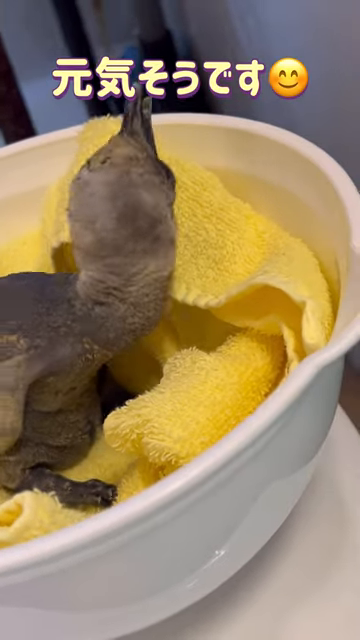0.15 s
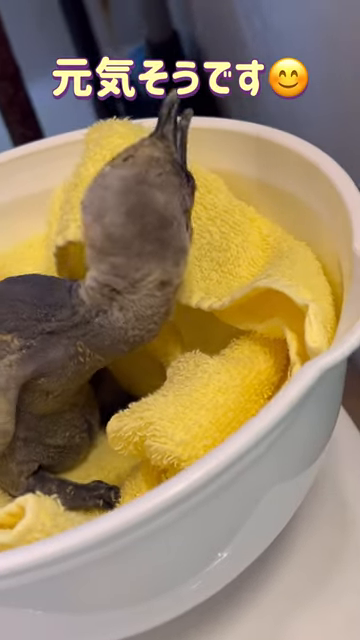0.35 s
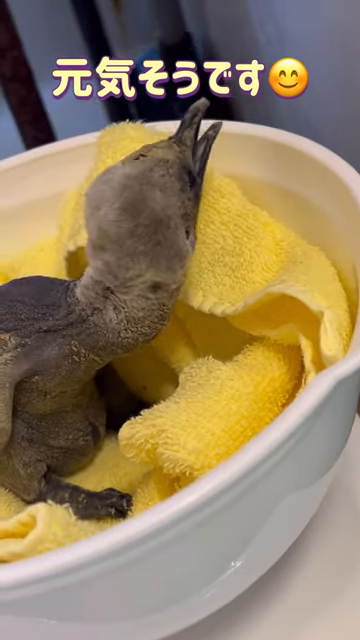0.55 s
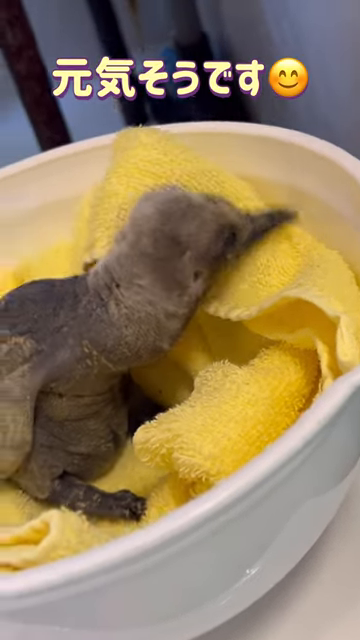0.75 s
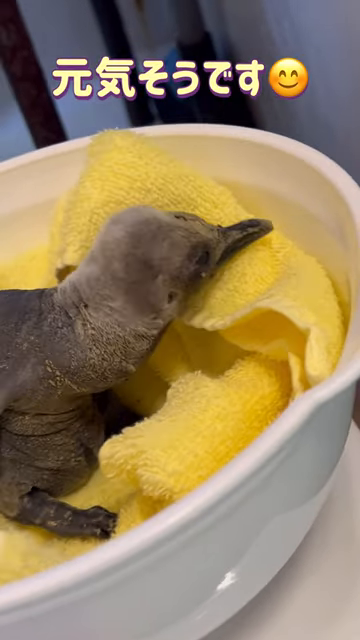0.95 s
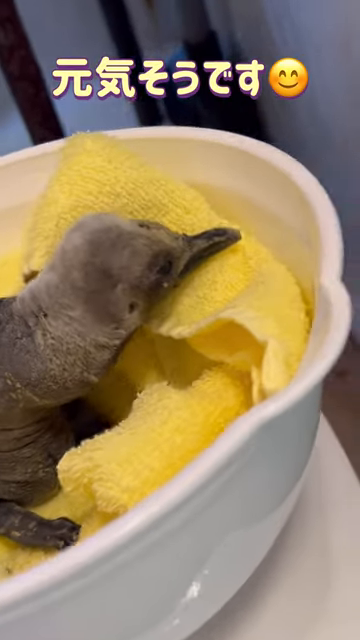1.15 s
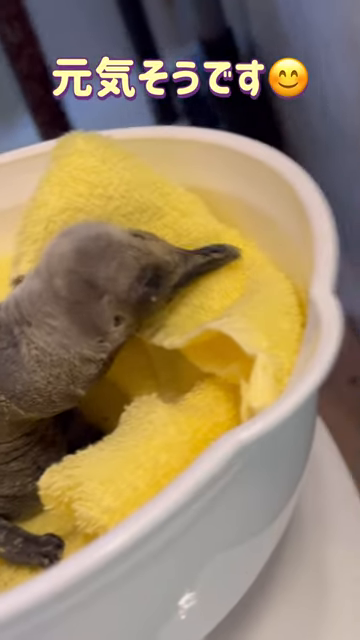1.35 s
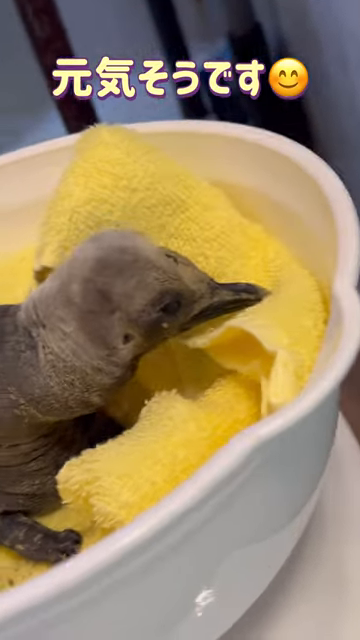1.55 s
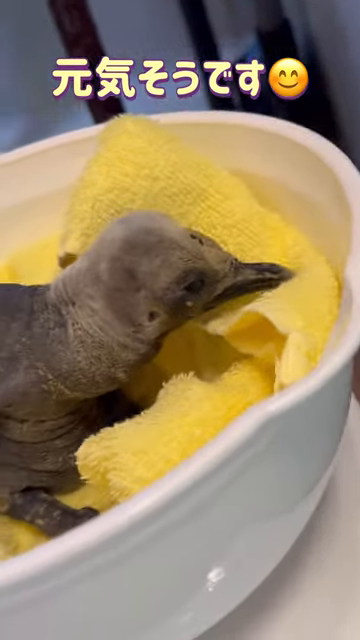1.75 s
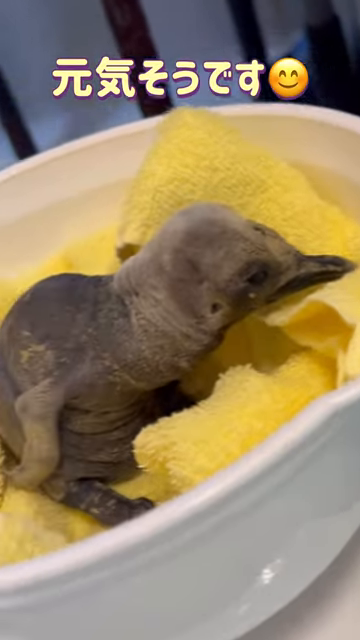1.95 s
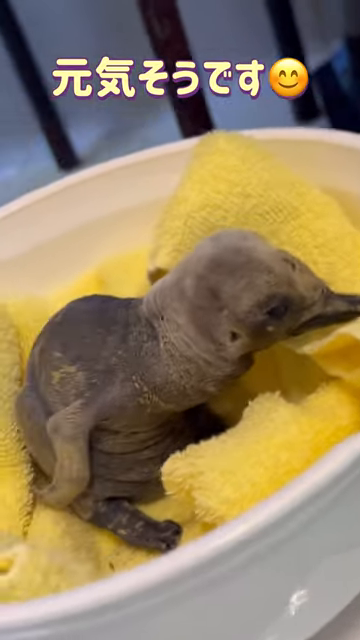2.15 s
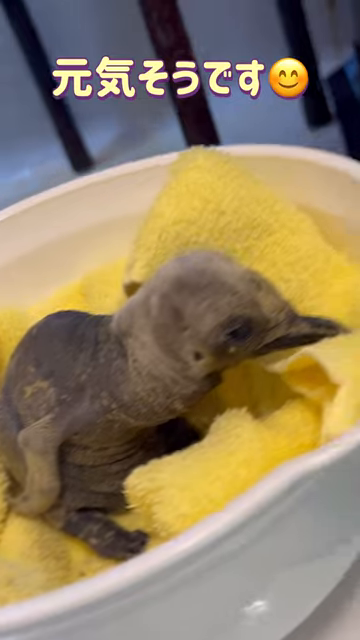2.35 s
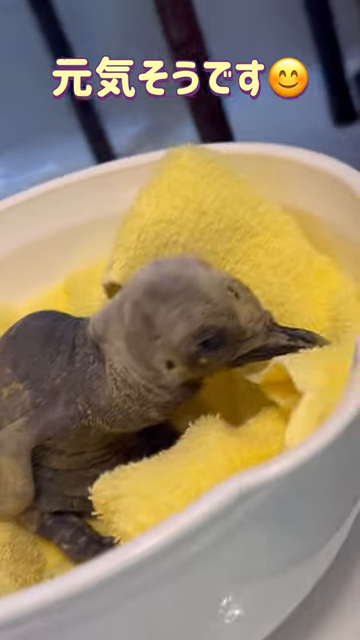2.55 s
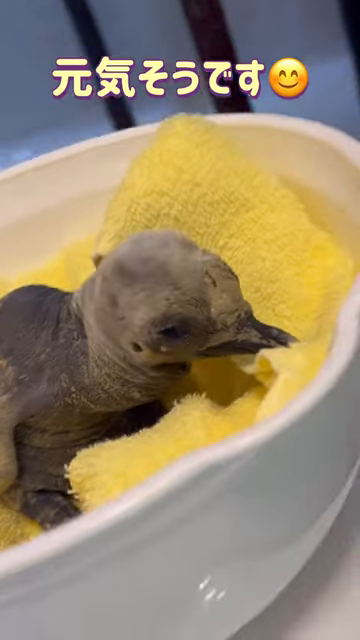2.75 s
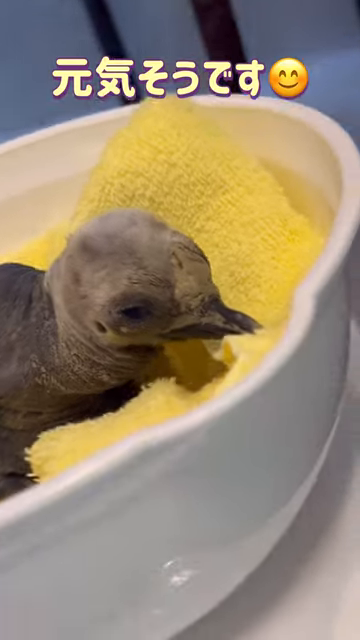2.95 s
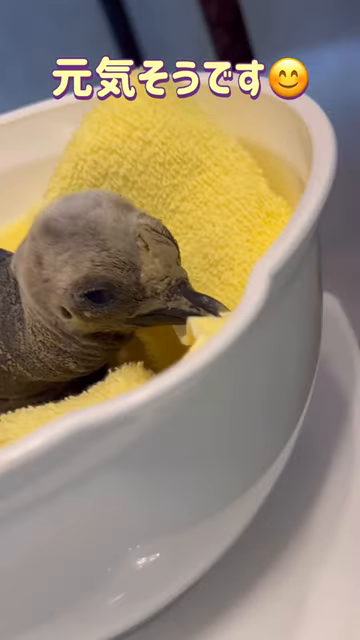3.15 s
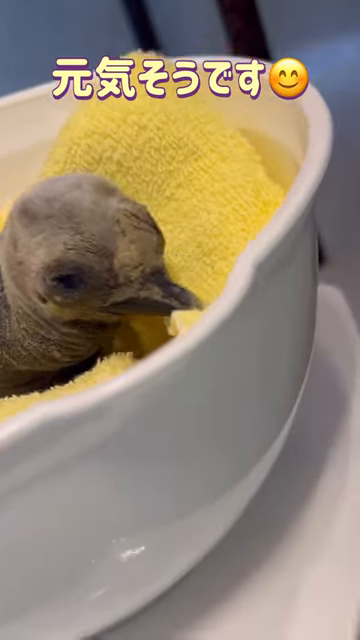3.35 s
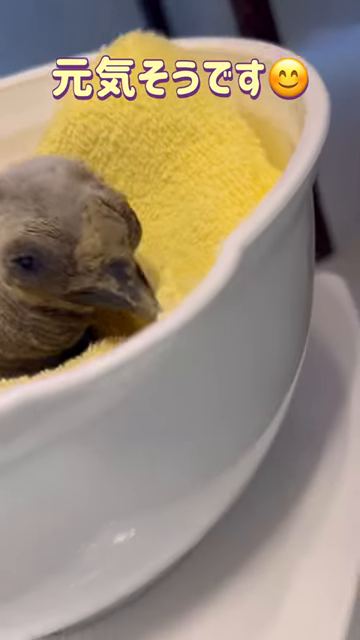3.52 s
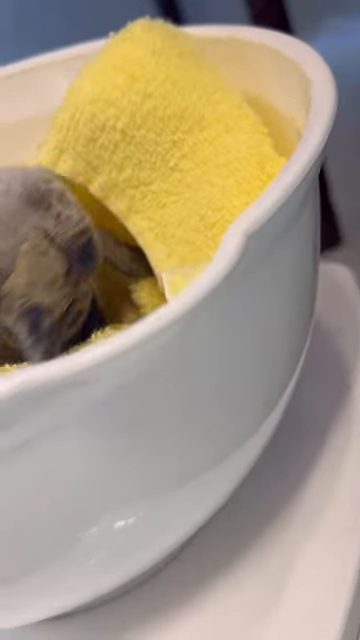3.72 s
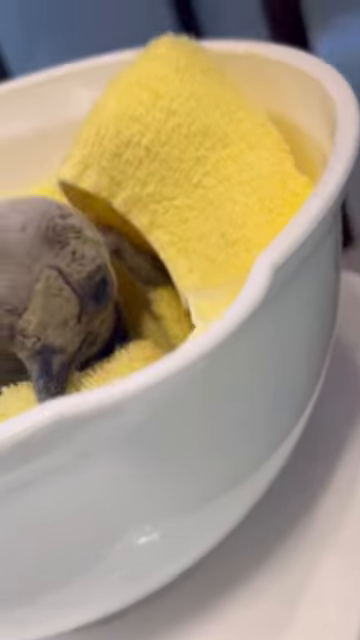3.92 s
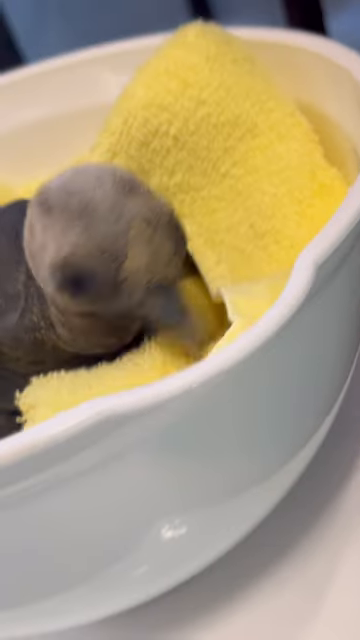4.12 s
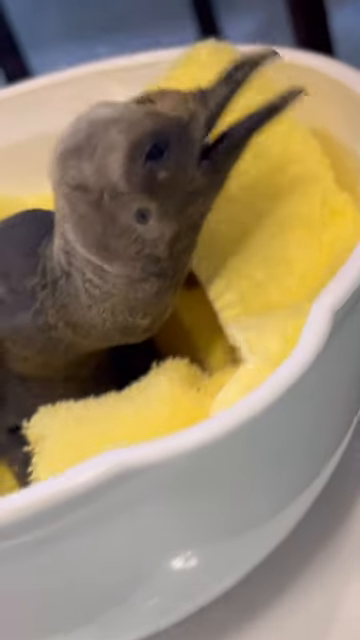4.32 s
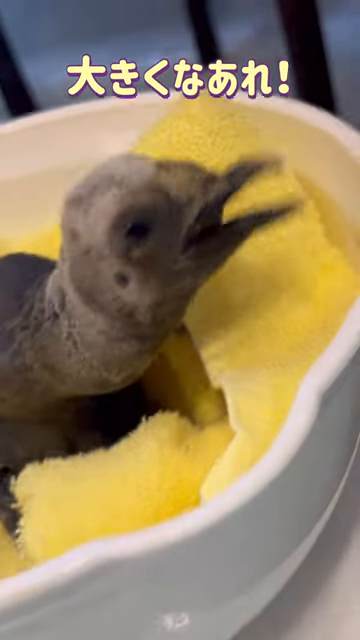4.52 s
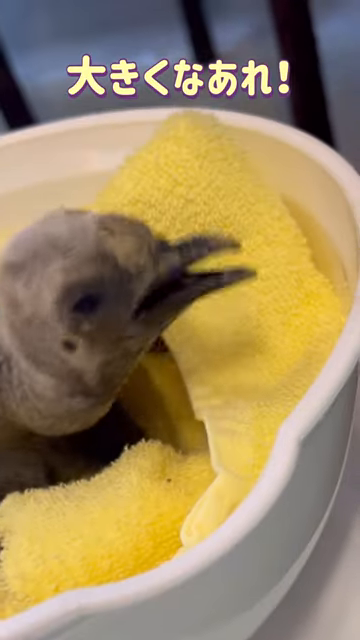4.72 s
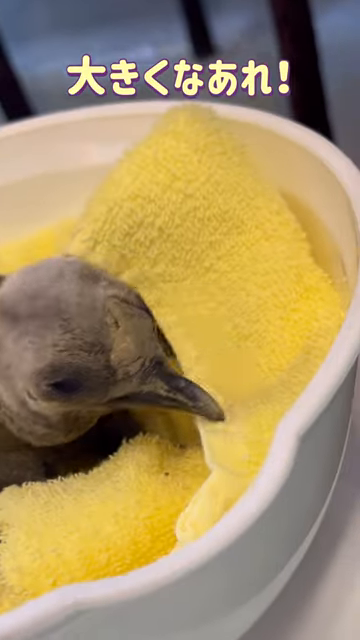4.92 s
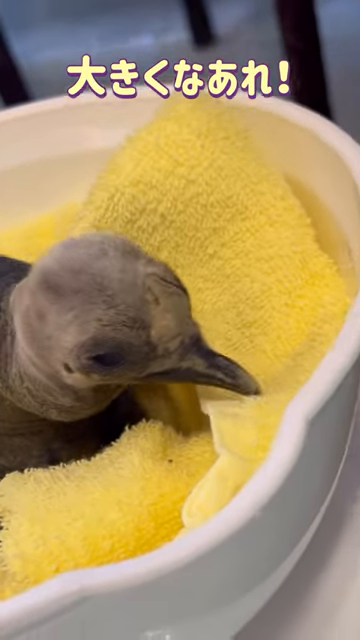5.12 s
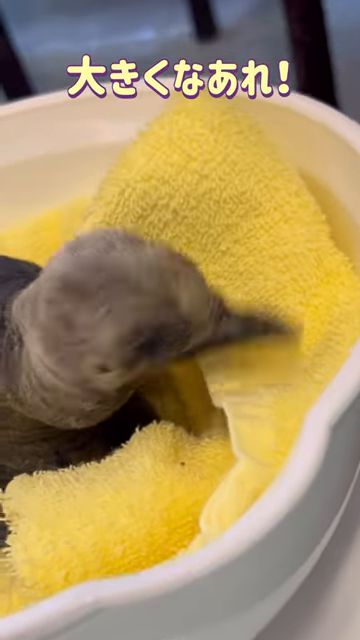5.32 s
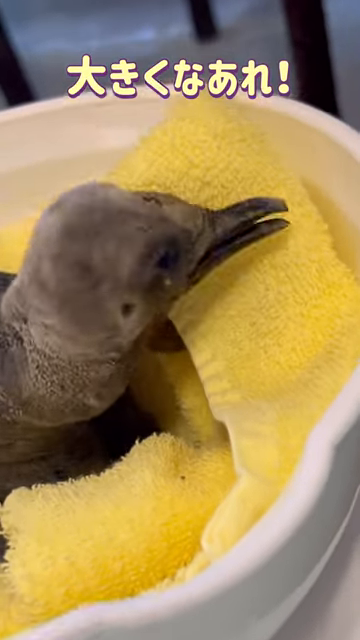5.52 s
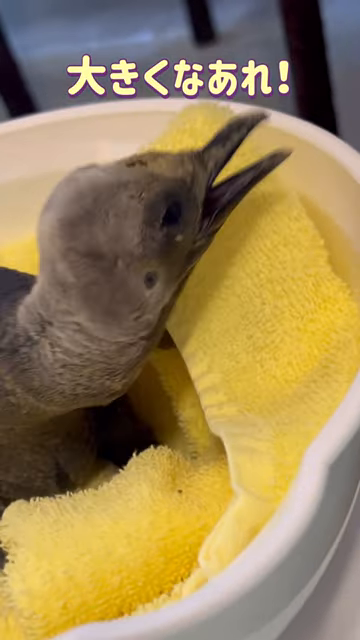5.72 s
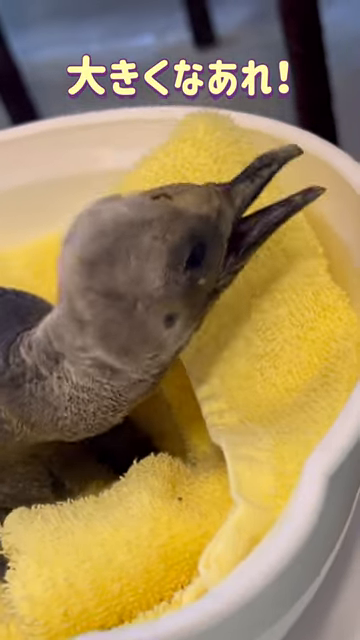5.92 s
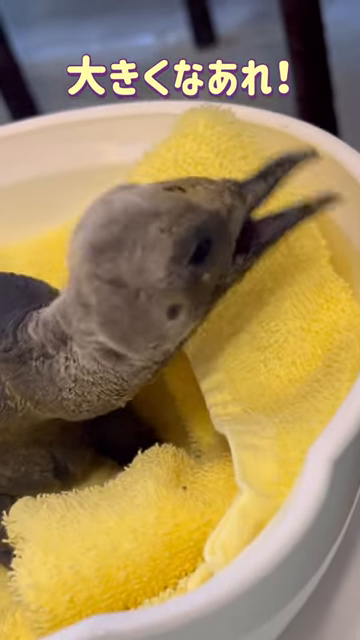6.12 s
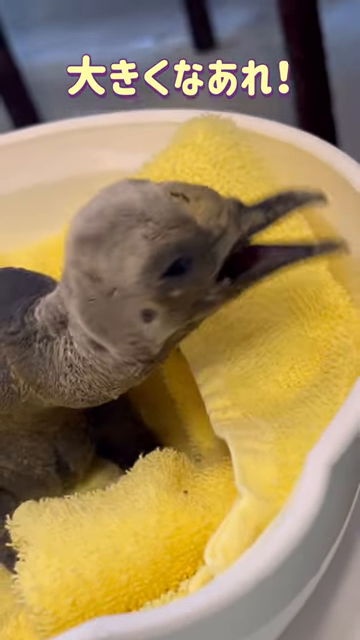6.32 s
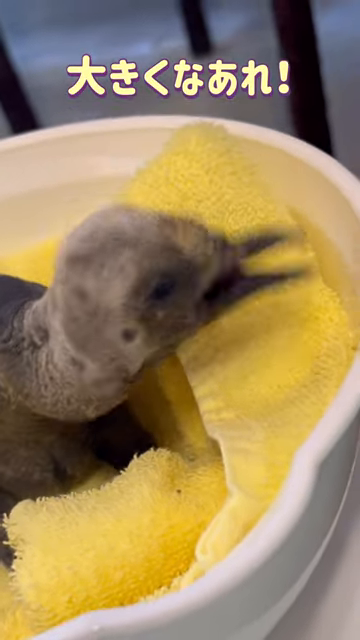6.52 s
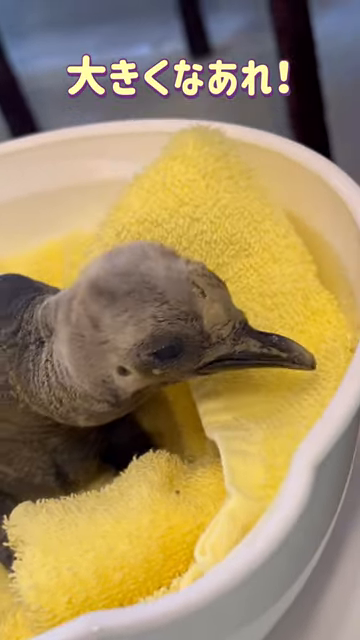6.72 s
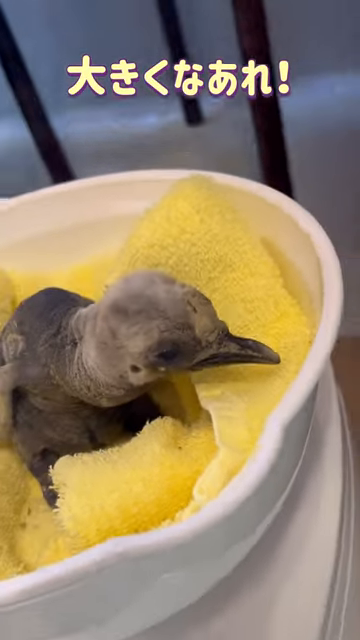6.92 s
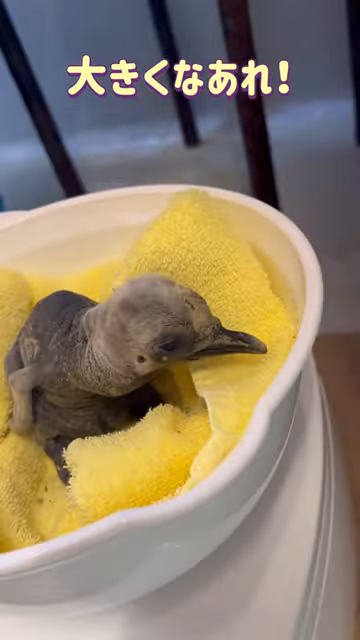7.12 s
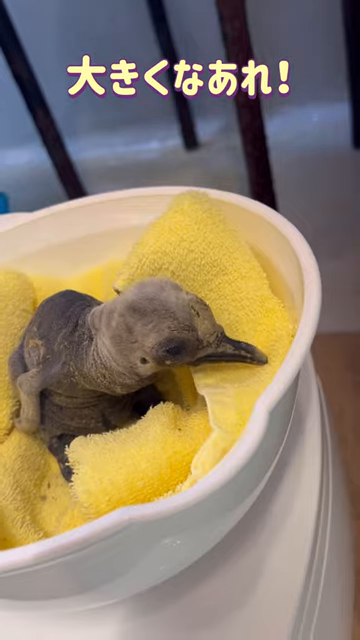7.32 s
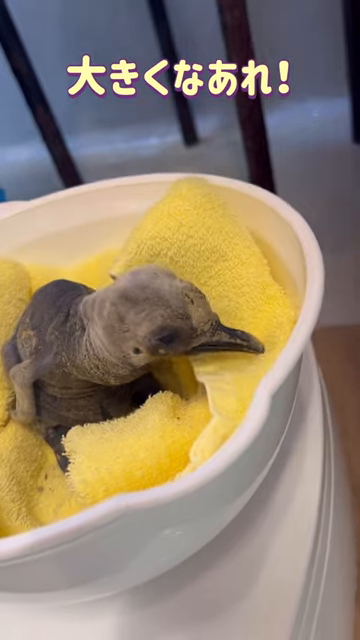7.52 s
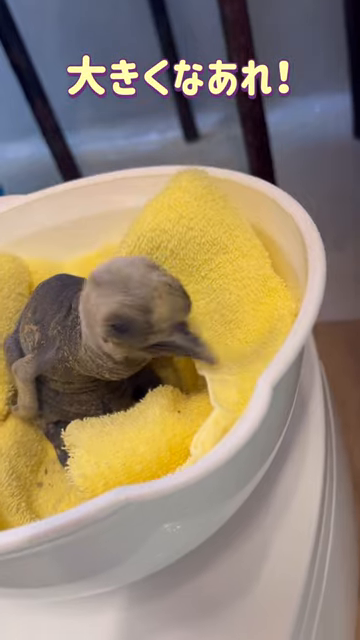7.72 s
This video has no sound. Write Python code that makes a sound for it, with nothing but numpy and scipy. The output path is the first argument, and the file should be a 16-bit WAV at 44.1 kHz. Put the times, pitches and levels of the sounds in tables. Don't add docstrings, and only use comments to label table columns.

```python
import sys
import numpy as np
from scipy import signal
from scipy.fft import rfft, irfft, next_fast_len
from scipy.io import wavfile
from scipy.ndimage import uniform_filter1d

SR = 44100
rng = np.random.default_rng(int(sys.argv[2]) if len(sys.argv) > 2 else 0)


def unload_audio(sound):
    columns = np.transpose(np.atleast_2d(sound))
    steps = np.round(np.clip(columns, -1, 1) * 32767)
    wavfile.write(sys.argv[1], SR, steps.astype(np.int16))


def natural_amplitude(level_db):
    exponent = np.asarray(level_db, float) / 20
    return 10 ** exponent


N = 346626

# time [s], pitch [Hz], whistle level [dB].
FIRST_BURST = [
    [(0.199, 2539, -49), (0.215, 2897, -20), (0.245, 2970, -14.5), (0.27, 2800, -24), (0.288, 2650, -33)],
    [(0.291, 2820, -24), (0.312, 3180, -20), (0.333, 3000, -16), (0.345, 3098, -19), (0.362, 2900, -28),
     (0.383, 2700, -44)],
    [(0.386, 2610, -38), (0.409, 3230, -17.5), (0.432, 2800, -14), (0.46, 2790, -15), (0.474, 2736, -27),
     (0.49, 2560, -18), (0.508, 2294, -28), (0.538, 2180, -28), (0.56, 2230, -38)],
    [(0.561, 2240, -39), (0.584, 2460, -37), (0.61, 2750, -60)],
]
SECOND_BURST = [
    [(4.238, 2068, -52), (4.268, 2590, -32.5), (4.3, 3005, -13.5), (4.338, 2933, -18), (4.368, 3050, -33),
     (4.392, 3017, -43)],
    [(4.418, 2848, -44), (4.434, 3062, -12), (4.45, 2592, -27), (4.468, 3073, -27), (4.492, 3010, -52)],
    [(4.517, 2758, -32), (4.537, 3130, -9.5), (4.567, 2680, -18.5), (4.593, 2862, -12.5),
     (4.615, 2460, -25), (4.651, 2046, -26), (4.675, 1870, -26.5), (4.694, 1994, -27.5), (4.725, 2300, -52)],
]
THIRD_BURST = [
    [(5.696, 2537, -40), (5.71, 2963, -16), (5.76, 3252, -16.5), (5.82, 3254, -17.5), (5.836, 3030, -15),
     (5.846, 2850, -30), (5.885, 2700, -60)],
    [(5.975, 2946, -33), (5.993, 3243, -15.5), (6.018, 2740, -19), (6.03, 2490, -27), (6.058, 1856, -25),
     (6.07, 2500, -34), (6.097, 3202, -60)],
    [(6.179, 2806, -38), (6.195, 2875, -13), (6.205, 2800, -16), (6.216, 2900, -25), (6.222, 2946, -40),
     (6.235, 2900, -52)],
    [(6.28, 2656, -37), (6.296, 2870, -15), (6.33, 2490, -27.5), (6.37, 2283, -26.5), (6.428, 2570, -37),
     (6.455, 2379, -52)],
]
NOTES = FIRST_BURST + SECOND_BURST + THIRD_BURST
# centre [Hz], width [Hz], level [dB].
BEAK = [(3685, 470, 4.5), (2770, 1050, -0.5), (4150, 300, -5), (1850, 640, -10.5)]
# frequency [Hz], phase [rad].
PORT_TURN = [(2500, 0), (3700, -.07), (4200, -.4), (4650, -1.1), (5000, -3.1), (5350, -5.1), (5800, -6.0),
             (6500, -6.28), (7400, -6.6), (8400, -7.3), (10200, -7.9), (11900, -8.5), (12900, -9.42),
             (14600, -9.42), (15400, -8.7)]


def rms_one(x):
    return x / np.sqrt(np.mean(x ** 2) + 1e-20)


def in_time(rows):
    s, *columns = np.transpose(rows)
    return [np.interp(np.arange(N) / SR, s, c) for c in columns]


def at_hz(points, hz):
    points_hz, values = np.transpose(points)
    return np.interp(np.log(hz + 1), np.log(points_hz), values)


def wobble(hz):
    r = np.exp(-2 * np.pi * hz / SR)
    noise = rng.standard_normal(N + SR)
    return rms_one(signal.lfilter([1], [1, -2 * r, r * r], noise)[SR:])


def resonate(x, hz, width_hz):
    r = np.exp(-np.pi * width_hz / SR)
    zeros = [(1 - r * r) / 2, 0, (r * r - 1) / 2]
    poles = [1, -2 * r * np.cos(2 * np.pi * hz / SR), r * r]
    return signal.lfilter(zeros, poles, x)


def resonate_twice(x, hz, width_hz):
    return resonate(resonate(x, hz, width_hz), hz, width_hz)


def coloured(spectrum, low_hz, high_hz):
    hz = np.arange(N // 2 + 1) * SR / N
    gain = natural_amplitude(at_hz(spectrum, hz))
    inside = (hz > low_hz) & (hz < high_hz)
    noise = irfft(rfft(rng.standard_normal(N)) * gain, N)
    return noise / np.sqrt(2 * np.sum(gain[inside] ** 2) / N)


def phase_of(hz):
    return 2 * np.pi * np.cumsum(hz) / SR


def chick():
    # start [s], length [s], pitch ratio to the whistle
    # at start, ratio at end, level [dB].
    lower_voice = [
        (.205, 0.059, 0.71, .64, -57),
        (.41, 0.13, .67, .66, -44),
        (4.255, 0.036, 0.67, 0.59, -40),
        (4.422, 0.039, 0.61, .63, -41),
        (4.516, 0.0464, .635, 0.72, -37),
        (4.57, .025, 0.62, .6, -36.5),
        (4.602, 0.0266, .6, 0.79, -40.5),
        (5.74, .11, .665, .667, -39),
        (5.98, 0.069, 0.64, 0.66, -43),
        (6.28, 0.056, 0.6, 0.56, -42),
    ]
    swell_db = 8
    octave_over_low_db, lift_db, lift_width_hz = -2.0, 20, 500
    jitter = 0.0045
    controls = voice()
    s, length_s, first_ratio, last_ratio, db = np.transpose(lower_voice)
    place, which = spells(zip(s, length_s))
    ratio = first_ratio[which] + (last_ratio - first_ratio)[which] * place
    pitch_hz = controls[0] * uniform_filter1d(ratio, SR // 150)
    low_db = uniform_filter1d(db[which] + swell_db * (np.sin(np.pi * place) - .5), SR // 200)
    octave_db = low_db + octave_over_low_db + beak_lift(2 * pitch_hz, lift_db, lift_width_hz)
    phase = phase_of(pitch_hz * (1 + jitter * wobble(113)))
    gate = uniform_filter1d(1. * (which >= 0), SR // 160)
    main, main_phase = whistle(controls, ordered=gate * natural_amplitude(octave_db))
    low = natural_amplitude(low_db) * np.sin(phase) + natural_amplitude(octave_db) * np.sin(2 * phase)
    low += natural_amplitude(low_db - 10.0) * np.sin(phase + main_phase)
    return main + np.sqrt(2) * gate * natural_amplitude(0.47 * wobble(100)) * low


def voice():
    # middle [s], half length [s], level [dB].
    breaks = [(0.24, .03, -28), (.3, 0.012, -31), (.375, 0.022, -34), (.52, 0.03, -37), (4.25, .012, -33),
              (4.321, 0.029, -30.5), (4.421, .01, -30), (4.452, 0.011, -38), (4.535, .03, -36),
              (4.657, 0.0091, -35), (5.703, 0.0075, -35), (5.812, .045, -34), (5.993, .012, -35),
              (6.187, .015, -25.5), (6.297, .015, -26), (6.365, 0.026, -34)]
    edge_loss_db = 3.5
    tail_starts_db, tail_thins = -35, 0.96
    t = np.arange(N) / SR
    pitch_hz, whistle_db = uniform_filter1d(in_time(np.concatenate(NOTES)), SR // 200)
    octave_db = -37 + 0.66 * (whistle_db + 13.5) + beak_lift(2 * pitch_hz, 20, 654)
    half_db = np.max([db - edge_loss_db * ((t - s) / half_s) ** 2 for s, half_s, db in breaks], axis=0)
    rasp_db, air_db = breath()
    thin_db = tail_thins * np.clip(rasp_db - tail_starts_db, -60, 0)
    octave_db = octave_db + thin_db
    half_db = np.maximum(half_db + thin_db, whistle_db - 32)
    rasp_db = rasp_db - 3 * np.clip((whistle_db + 25) / 17, 0, 1)
    return pitch_hz, whistle_db, octave_db, half_db, rasp_db, air_db


def breath():
    # start [s], hold [s], level at start [dB], level at end of hold [dB],
    # beak gape [dB].
    pushes = [
        (0.198, 0.099, -28.5, -25, 1.5),
        (0.267, 0.13, -31, -28, 2.5),
        (0.395, .16, -20, -36.5, -4.5),
        (4.24, 0.12, -26, -24.5, 2.5),
        (4.421, 0.046, -18, -26, -1.5),
        (4.517, 0.16, -15.5, -33, -5.5),
        (5.69, 0.16, -27, -24, 1),
        (5.973, 0.093, -18.5, -32.5, -1),
        (6.178, 0.035, -17.5, -24, -2.5),
        (6.28, 0.12, -19, -40.5, -3.5),
    ]
    # time [s], level added [dB].
    spurts = [
        (.475, 1),
        (4.463, 3.5),
        (5.7, 8),
        (6.076, 14),
        (6.217, 7),
        (6.285, 10),
    ]
    spurt_half_s = .007
    rise_db_per_s, fall_db_per_s = 900, 650
    air_under_rasp_db, air_follows = -40, 0.59
    t = np.arange(N) / SR
    pushes = np.array(pushes)
    current = np.maximum(np.searchsorted(pushes[:, 0], t + .003) - 1, 0)
    s, hold_s, first_db, last_db, gape_db = pushes[current].T
    rise_db = np.minimum(rise_db_per_s * (t - s - .012), 0)
    sag_db = (last_db - first_db) * np.clip((t - s) / hold_s, 0, 1)
    push_db = first_db + sag_db - fall_db_per_s * np.maximum(t - s - hold_s, 0)
    spurt_db = sum(db * np.exp(-((t - at_s) / spurt_half_s) ** 2) for at_s, db in spurts)
    air_db = air_under_rasp_db + gape_db + air_follows * (push_db + 25)
    return push_db + rise_db + spurt_db, air_db


def whistle(controls, ordered):
    # multiple of the pitch, level against the octave [dB].
    overtones = [(3, -10), (4, -20)]
    # multiple of the pitch, level against the 3/2 line [dB].
    half_lines = [(1 / 2, -19.5), (3 / 2, 0), (5 / 2, -20.5)]
    # frequency [Hz], density [dB per Hz].
    air_colour = [(1100, -33), (1600, 9), (5000, 13), (6500, 10.5), (8500, 9.5), (10000, 1), (12000, 9),
                  (16000, 3)]
    jitter, waver, shimmer_db = .005, 1.3, 2.2
    sixths_share = .6
    pitch_hz, whistle_db, octave_db, half_db, rasp_db, air_db = controls

    phase = phase_of(pitch_hz * (1 + jitter * (wobble(270) + waver * wobble(35.3))))
    shimmer = np.minimum(wobble(167), .6)
    tone = natural_amplitude(whistle_db + shimmer_db * shimmer) * np.sin(phase)
    tone += natural_amplitude(octave_db + 1.5 + past_ports(2 * pitch_hz)) * np.sin(2 * phase)
    overtone_db = np.minimum(octave_db, whistle_db - 12.5)
    tone += sum(natural_amplitude(overtone_db + db) * np.sin(k * phase) for k, db in overtones)
    half_db = half_db + past_ports(1.5 * pitch_hz) + 3 * np.minimum(wobble(80), .6)
    tone += sum(natural_amplitude(half_db + db) * np.sin(k * phase) for k, db in half_lines)
    sideband_db = half_db - 14.5 + beak_lift(7 / 6 * pitch_hz, 14.5, 350)
    tone += natural_amplitude(sideband_db) * np.sin(7 / 6 * phase)

    puffs = rng.standard_normal(N) * np.sqrt(1 - sixths_share)
    puffs = puffs + np.sqrt(sixths_share / 6) * sixths(phase)
    puffs = puffs * natural_amplitude(0.9 * np.minimum(wobble(140), 1))
    rasp = sum((-1) ** i * natural_amplitude(db) * rms_one(resonate_twice(puffs, hz, width_hz))
               for i, (hz, width_hz, db) in enumerate(BEAK))
    rasp_power = natural_amplitude(rasp_db - beak_lift(2 * pitch_hz, 12.0, 300)) ** 2
    rasp *= np.sqrt(np.maximum(rasp_power - 1.3 * ordered ** 2, .08 * rasp_power))

    gate = sounding(NOTES, .004)
    air = natural_amplitude(air_db + 3.5 + 3.9 * wobble(29)) * coloured(air_colour, 6600, 13030)
    return gate * (np.sqrt(2) * tone + natural_amplitude(-3.5) * rasp + air), phase


def sixths(phase):
    flicker_hz = 45
    lines = sum(wobble(flicker_hz) * np.sin(k / 6 * phase) + wobble(flicker_hz) * np.cos(k / 6 * phase)
                for k in (4, 5, 7, 8, 10, 11))
    return rms_one(lines)


def beak_lift(hz, lift_db, width_hz):
    return lift_db / (1 + ((hz - BEAK[0][0]) / width_hz) ** 2)


def past_ports(hz):
    return -20 * np.log10(np.maximum(abs(np.cos(at_hz(PORT_TURN, hz) / 2)), .5))


def sounding(tables, edge_s):
    gate = np.zeros(N)
    for rows in tables:
        start = round(rows[0][0] * SR) - 2
        stop = round((rows[-1][0] + edge_s) * SR) + SR // 300
        gate[start:stop] = 1
    return uniform_filter1d(gate, max(int(edge_s * SR), 1))


def spells(rows):
    t, place, which = np.arange(N) / SR, np.zeros(N), np.full(N, -1)
    for k, (s, length_s) in enumerate(rows):
        inside = (t >= s) & (t < s + length_s)
        place[inside] = (t[inside] - s) / length_s
        which[inside] = k
    return place, which


def knocks():
    # start [s], peak level [dB], centre [Hz], width [Hz], T60 [s].
    bursts = [
        (2.639, -36.5, 2200, 2800, 0.2),
        (2.64, -37.5, 970, 700, 0.27),
        (2.641, -37.5, 470, 610, 0.27),
        (2.65, -40, 3200, 1200, .15),
        (3.22, -46, 5700, 5000, 0.2),
        (3.955, -42, 3400, 600, 0.13),
        (7.325, -38, 410, 170, .5),
        (7.61, -41, 480, 240, 0.53),
    ]
    out, t = np.zeros(N), np.arange(SR // 2) / SR
    for s, db, hz, width_hz, t60_s in bursts:
        noise = rms_one(resonate_twice(rng.standard_normal(len(t)), hz, width_hz))
        attack = np.minimum(t / 0.0017, 1)
        at = round(s * SR)
        out[at:at + len(t)] += (natural_amplitude(db - 60 * t / t60_s) * attack * noise)[:N - at]
    return out


def room(x):
    t60_s, level_db, side_db = 0.25, -14.5, -12.5
    t = np.arange(SR // 2) / SR
    mid, side = rng.standard_normal((2, len(t))) * natural_amplitude(-60 * t / t60_s) * (t > .004)
    tails = np.array([mid + natural_amplitude(side_db) * side, mid - natural_amplitude(side_db) * side])
    tails = tails / np.sqrt(np.sum(mid ** 2))
    return natural_amplitude(level_db) * signal.fftconvolve(x[None], tails, axes=1)[:, :N]


def shuffle():
    # time of full level [s], hold [s], level [dB].
    drags = [
        (7.34, .08, -38),
        (7.6, .12, -36.5),
    ]
    # frequency [Hz], density [dB per Hz].
    drag_colour = [(200, -10), (390, -3), (600, -14), (800, -10.5), (1400, -14.5), (2200, -16.5),
                   (3100, -24.5), (3900, -21.5), (5500, -30.5), (9000, -51)]
    rise_db_per_s, fall_db_per_s = 380, 48
    t, level = np.arange(N) / SR, np.zeros(N)
    for s, hold_s, db in drags:
        rise_db = np.minimum(rise_db_per_s * (t - s), 0)
        fall_db = fall_db_per_s * np.maximum(t - s - hold_s, 0)
        level += natural_amplitude(db + rise_db - fall_db)
    mid, side = coloured(drag_colour, 430, 5000), coloured(drag_colour, 600, 5000)
    return level * natural_amplitude(2.0 * wobble(24)) * (mid + natural_amplitude(-6.5) * side * [[1], [-1]])


def fans():
    # time [s], lower drone [dB], upper drone [dB].
    drone_levels = [(0.0, -28.5, -36), (0.3, -32, -27.5), (0.79, -14.5, -24), (1.4, -36, -19.5),
                    (1.97, -30, -29), (2.17, -17, -20), (2.5, -35, -24), (2.91, -17.5, -24),
                    (3.26, -28, -27), (3.64, -16, -17.5), (4.62, -31, -25.5), (4.86, -13.5, -18.5),
                    (5.33, -27, -27), (5.47, -19, -19), (6.4, -20, -20), (6.55, -22, -27.5),
                    (6.9, -22.5, -22), (7.86, -27, -29)]
    # time [s], whine [dB].
    whine_levels = [(0.0, -34.5), (0.61, -39.5), (1.6, -26.5), (3.24, -29), (3.79, -32.5), (5.32, -30),
                    (6.2, -40.5), (6.8, -28.5), (7.86, -23.5)]
    # centre [Hz], width [Hz], rms level [dB].
    room_modes = [(32.4, 13, -66), (67.54, 7.8, -24.5), (83.4, 11, -45.5), (108.5, 5.4, -37),
                  (113.3, 2.5, -35), (145.15, 6.3, -38.5), (153.4, 10.7, -38.5), (187.3, 35, -40),
                  (217.14, 4.7, -37.5), (229.8, 5, -40.5), (274.8, 23, -44.5), (367.7, 80, -48)]
    drone_hz, whine_hz = (63.9, 73.16), 172
    whine_db, = in_time(whine_levels)
    drone = sum(natural_amplitude(db - 2.4) * np.sin(phase_of(hz + 0.745 * wobble(1.36)))
                for hz, db in zip(drone_hz, in_time(drone_levels)))
    whine = natural_amplitude(whine_db + 1.2 * wobble(5.8)) * np.sin(phase_of(whine_hz + 0.63 * wobble(1.18)))
    white = rng.standard_normal(N + SR)
    modes = sum(natural_amplitude(db) * rms_one(resonate_twice(white, hz, width_hz)[SR:])
                for hz, width_hz, db in room_modes)
    lean = np.array([[-1], [1]])
    upper = signal.sosfilt(signal.butter(2, 135, "high", fs=SR, output="sos"), modes)
    return np.sqrt(2) * (drone + whine * natural_amplitude(1.0 * lean)) + modes + 0.087 * lean * upper


def bed():
    # frequency [Hz], density [dB per Hz].
    bed_colour = [(20, 6), (250, -5), (500, -9), (860, -13.5), (1200, -18), (1900, -20.5), (2900, -25.5),
                  (4300, -30), (5000, -29), (6700, -27), (8400, -28), (10000, -36.5), (11900, -31.5),
                  (15500, -39)]
    # frequency [Hz], side level under mid [dB].
    spread = [(60, -55), (200, -5.5), (380, -7.5), (700, -3), (1300, -3.5), (1900, -10), (2300, -27),
              (4500, -24), (5000, -2.5), (5600, -40)]
    # time [s], level of the 5-10 kHz part [dB].
    air_flow = [(0, -54.5), (1.8, -54), (3.2, -53.5), (5.4, -53.5), (6.6, -55), (7.86, -54)]
    mid, other = coloured(bed_colour, 4930, 10900), coloured(bed_colour, 5200, 9400)
    hz = np.arange(N // 2 + 1) * SR / N
    side = irfft(rfft(other) * natural_amplitude(at_hz(spread, hz)), N)
    flow_db, = in_time(air_flow)
    return natural_amplitude(flow_db + 0.23 * wobble(27)) * (mid + side * [[1], [-1]])


def scene():
    near = chick() + knocks()
    return near + room(near) + fans() + bed() + shuffle()


def band_limit(x):
    return signal.sosfilt(signal.butter(12, 16070, fs=SR, output="sos"), x)


def record(dry):
    overload, cutoff_hz, pad = .95, 16100, 2048
    rounded = overload * np.tanh(dry / overload)
    longer = np.pad(rounded, [(0, 0), (pad, pad)], mode="reflect")
    size = next_fast_len(longer.shape[1])
    turn = at_hz(PORT_TURN, np.arange(size // 2 + 1) * SR / size)
    x = irfft(rfft(longer, size) * np.exp(.5j * turn * [[1], [-1]]), size)[:, pad:pad + N]
    x = signal.sosfilt(signal.cheby2(12, 70, cutoff_hz, fs=SR, output="sos"), x)
    x = x * np.minimum(np.arange(N, 0, -1) / 200, 1)
    return band_limit(x)


dry = scene()
out = record(dry)
unload_audio(out)
```